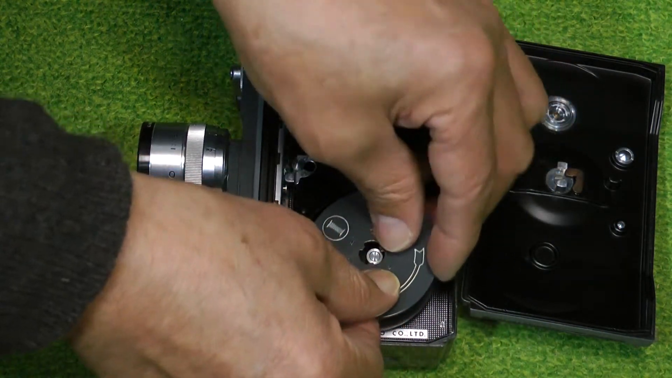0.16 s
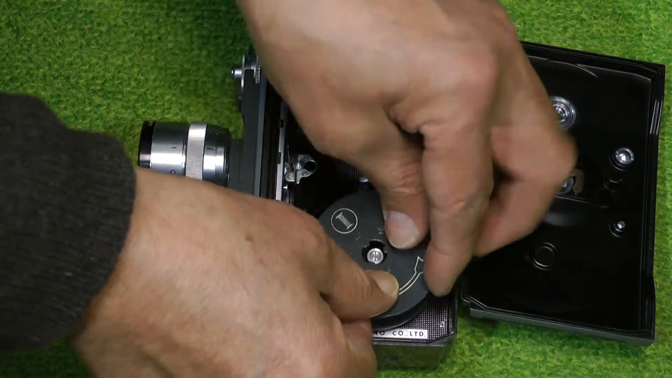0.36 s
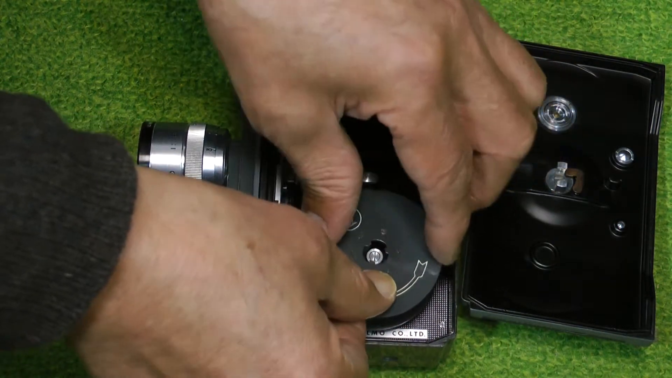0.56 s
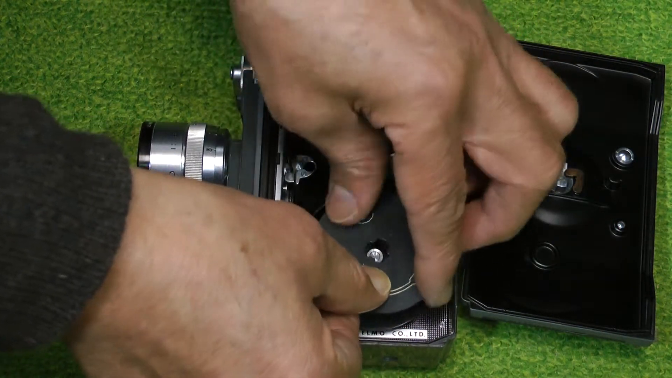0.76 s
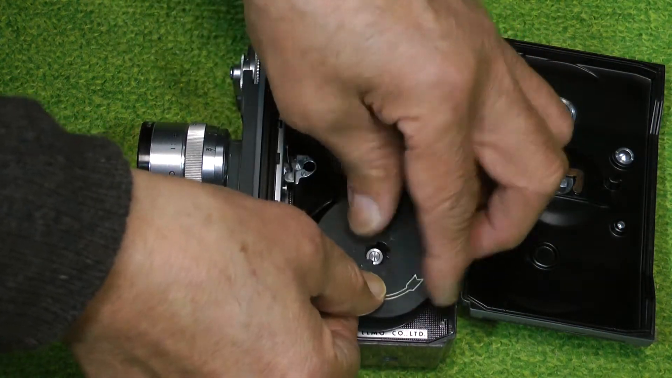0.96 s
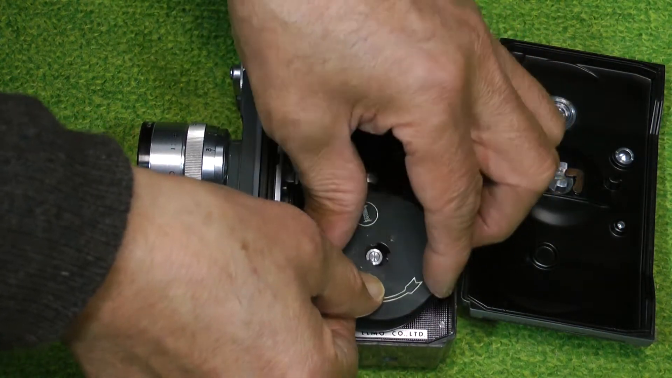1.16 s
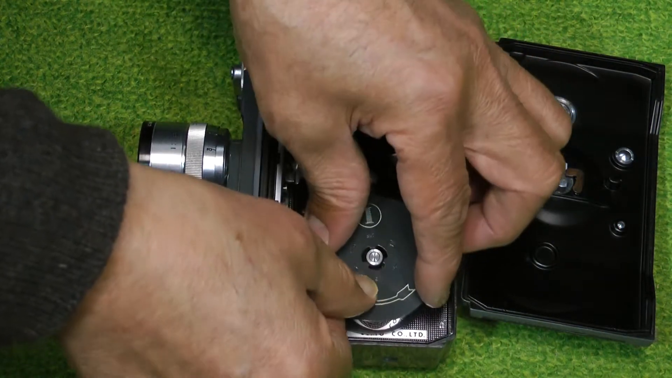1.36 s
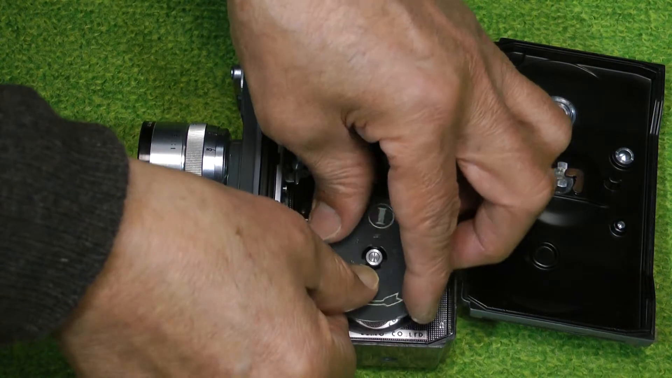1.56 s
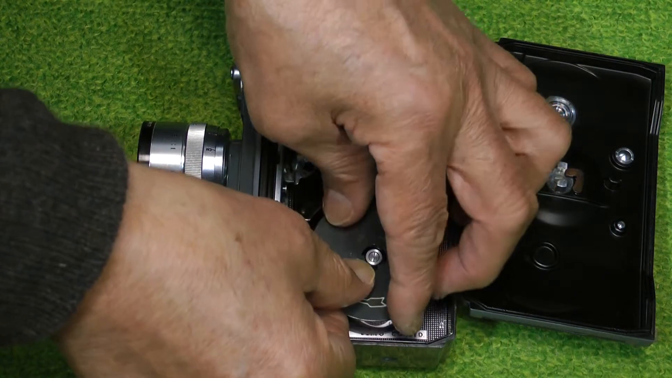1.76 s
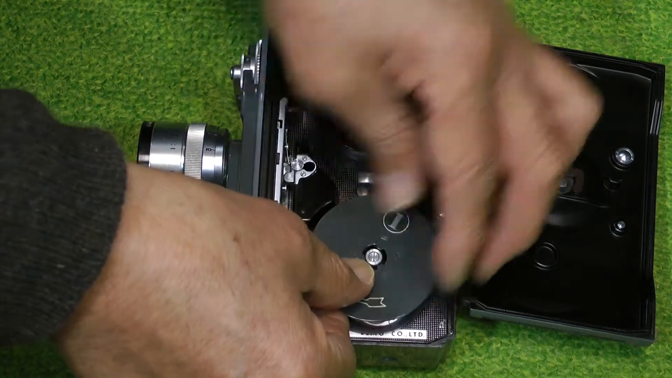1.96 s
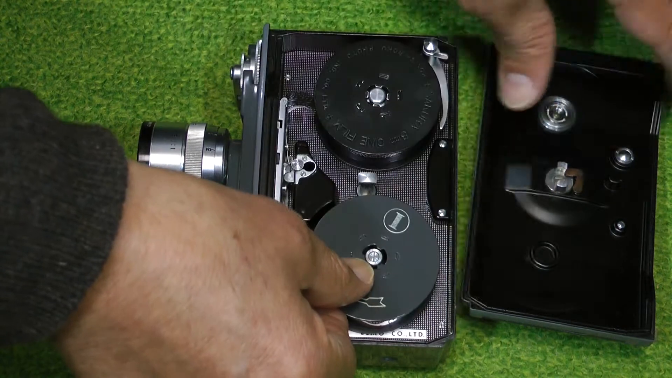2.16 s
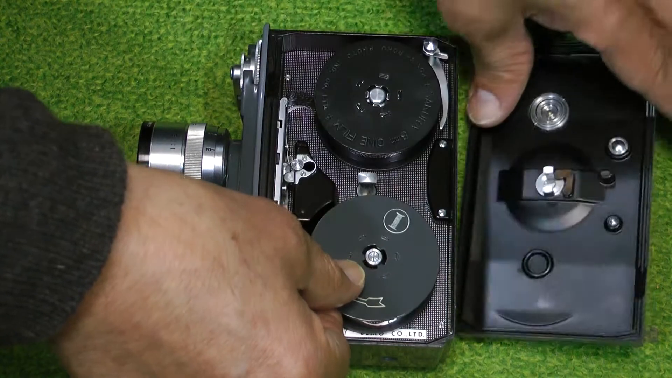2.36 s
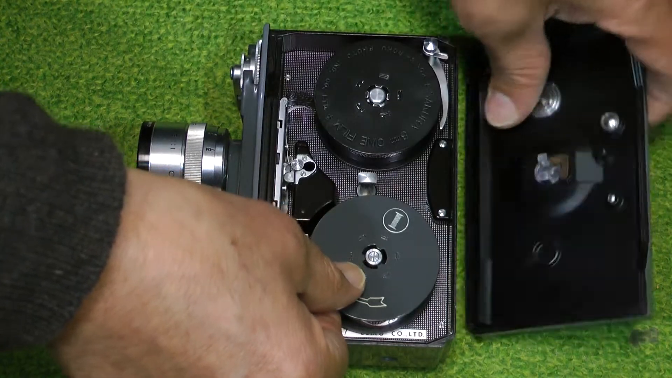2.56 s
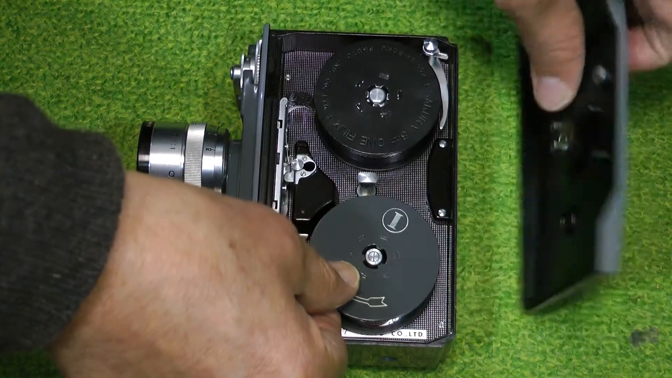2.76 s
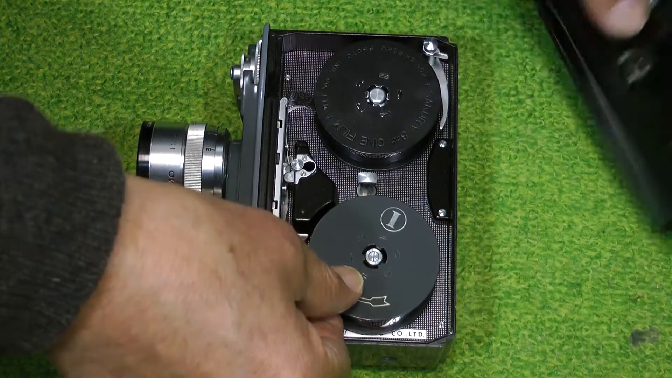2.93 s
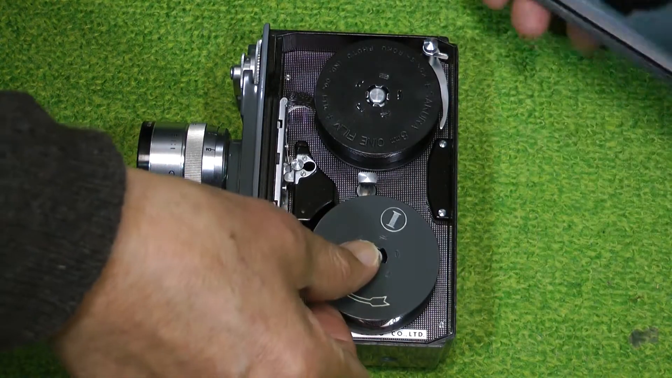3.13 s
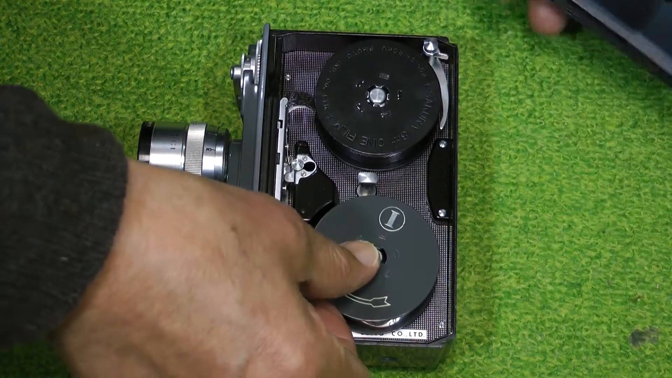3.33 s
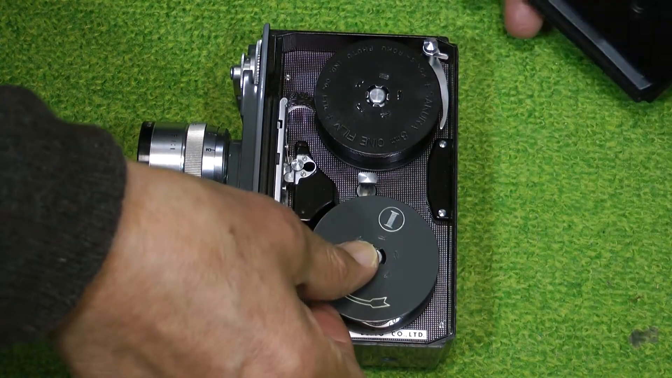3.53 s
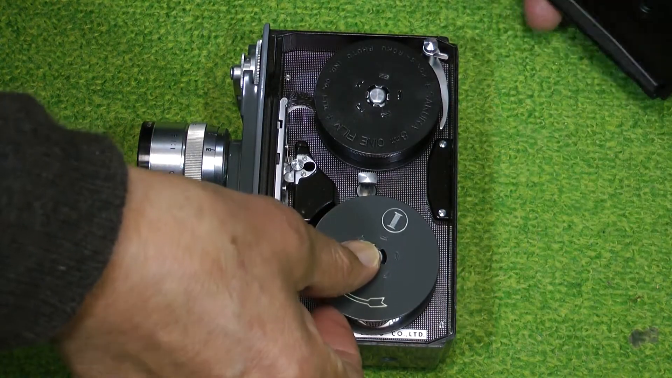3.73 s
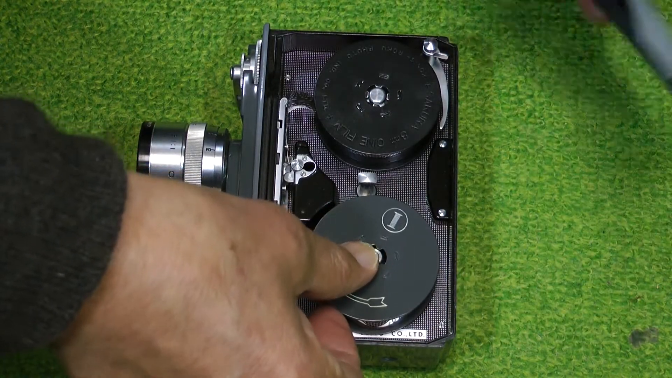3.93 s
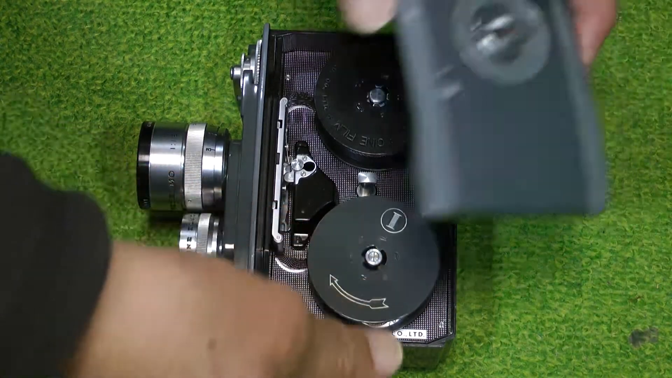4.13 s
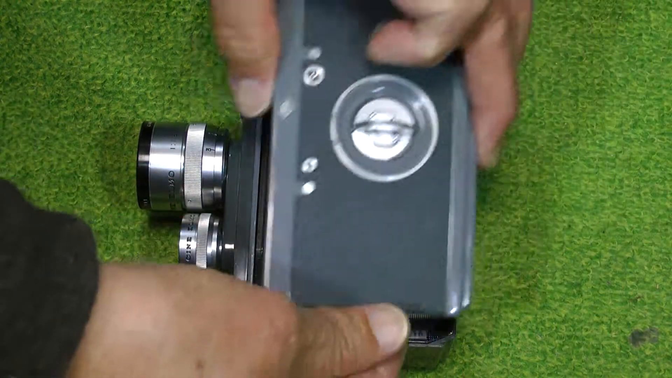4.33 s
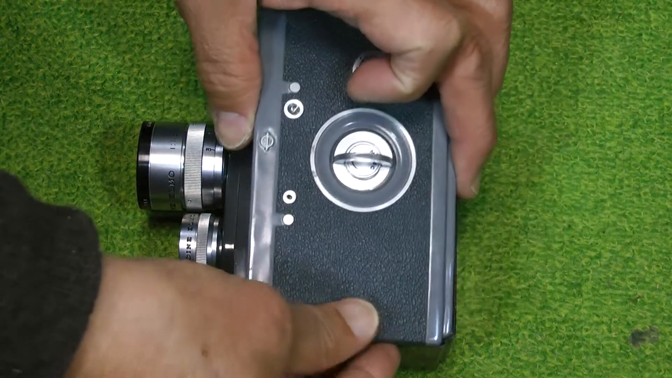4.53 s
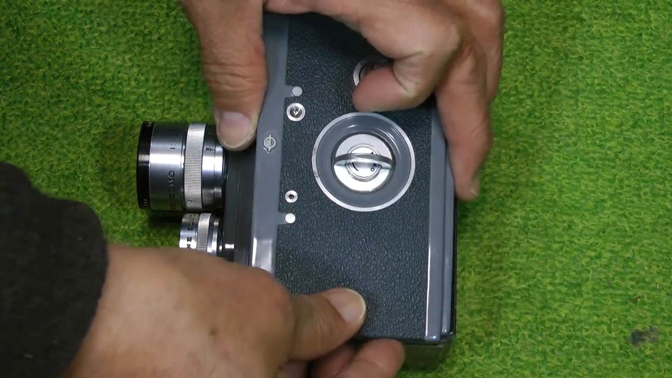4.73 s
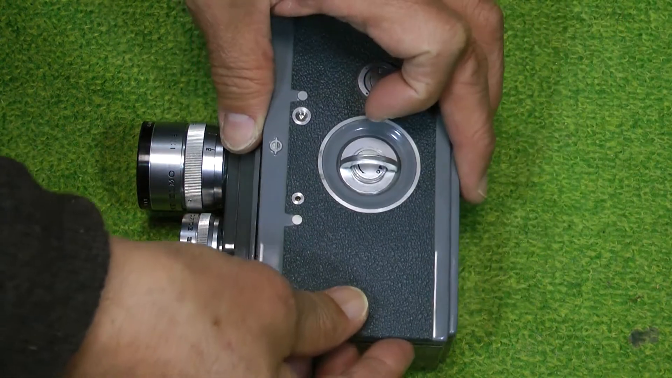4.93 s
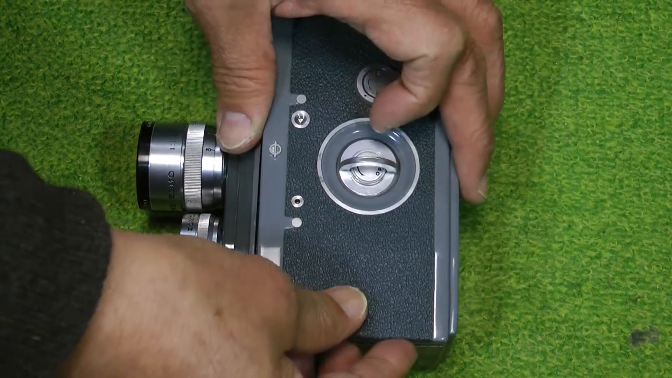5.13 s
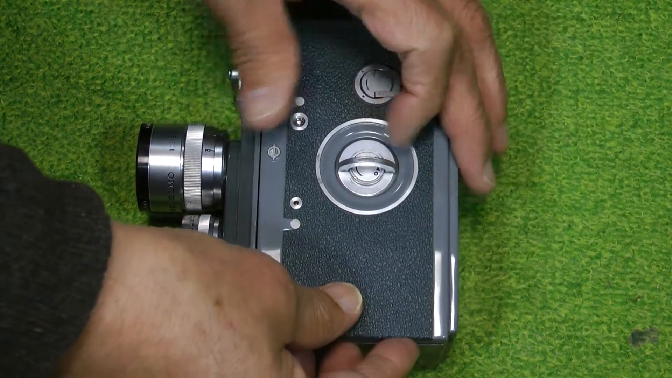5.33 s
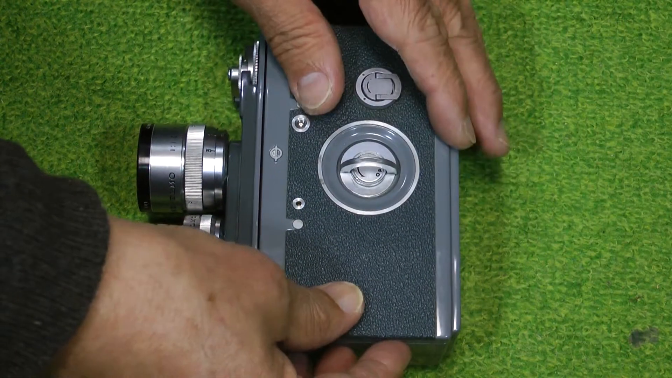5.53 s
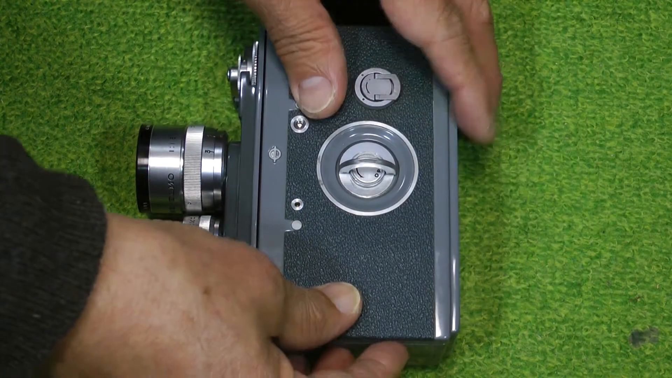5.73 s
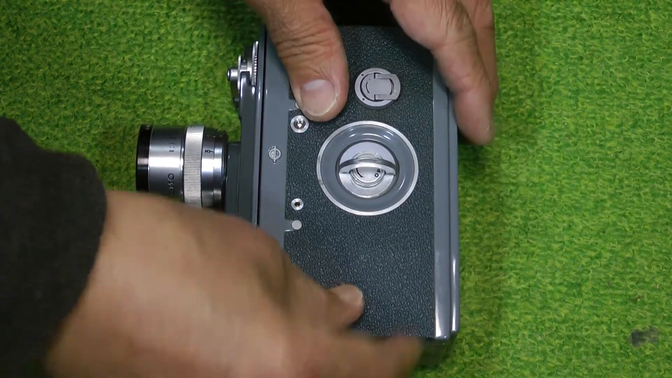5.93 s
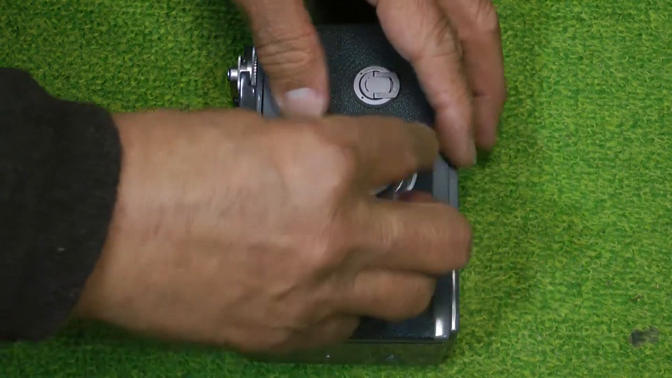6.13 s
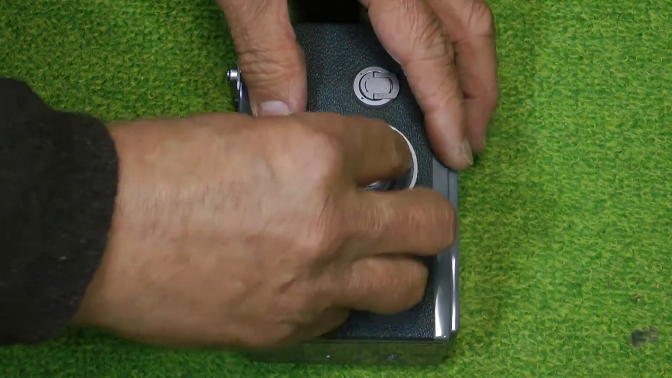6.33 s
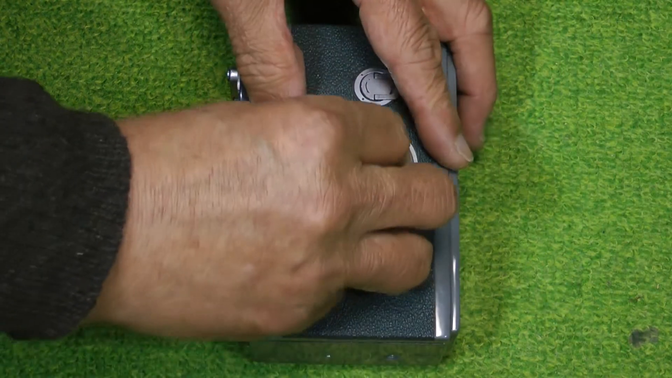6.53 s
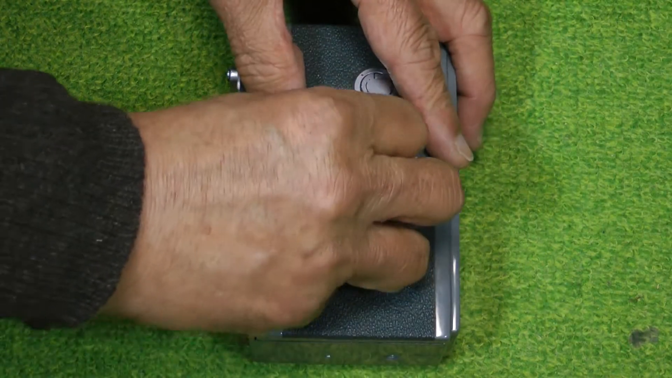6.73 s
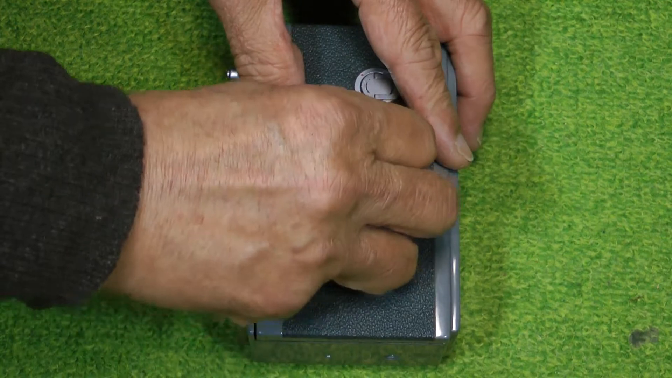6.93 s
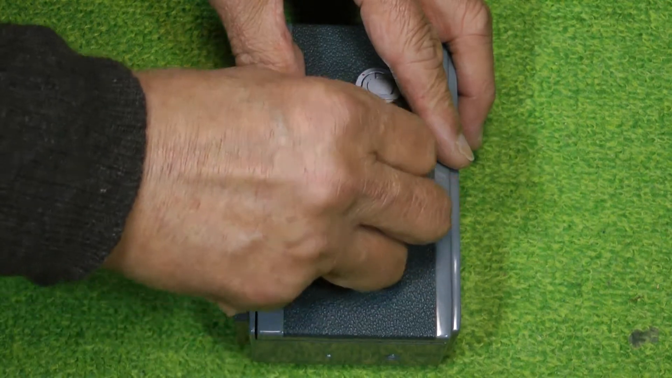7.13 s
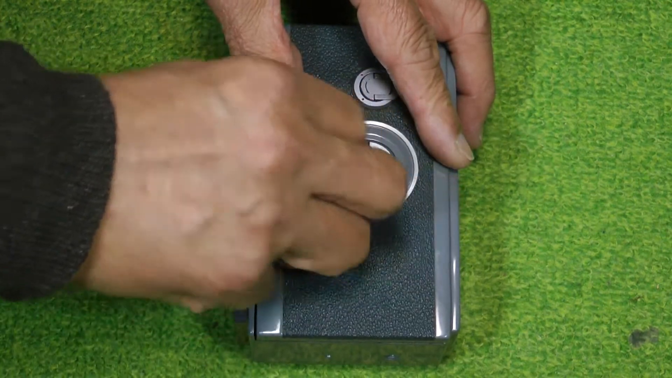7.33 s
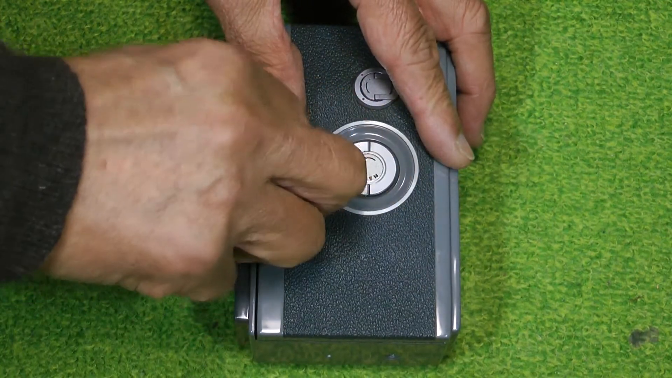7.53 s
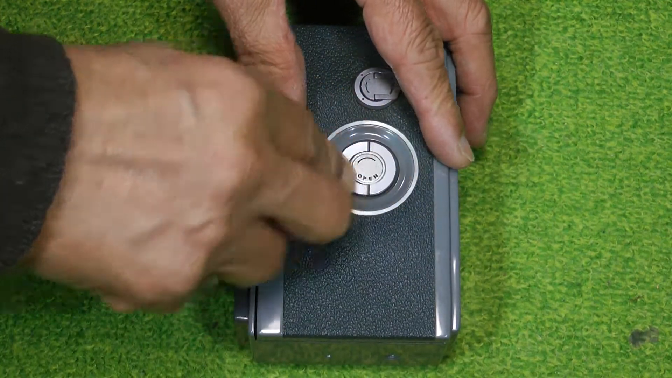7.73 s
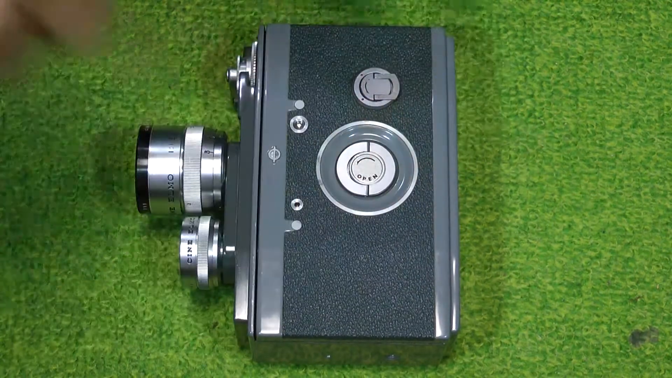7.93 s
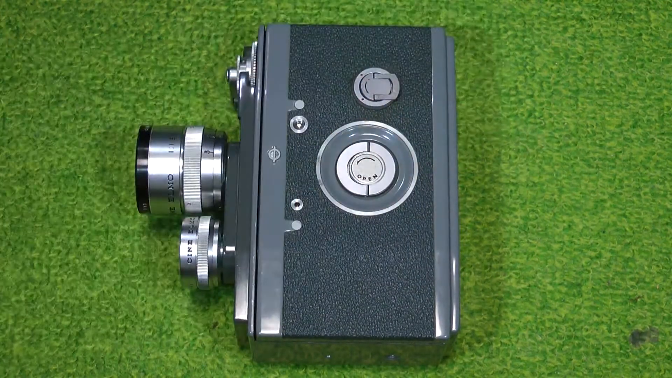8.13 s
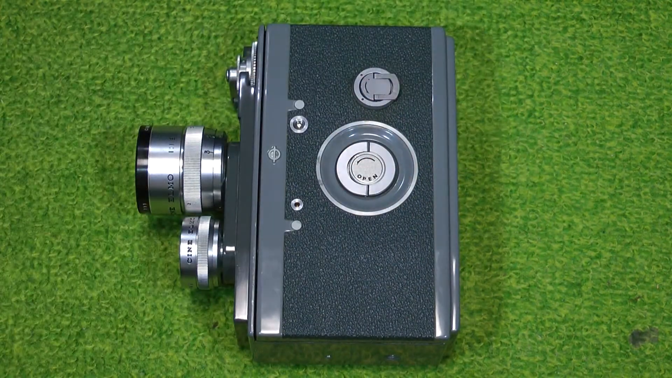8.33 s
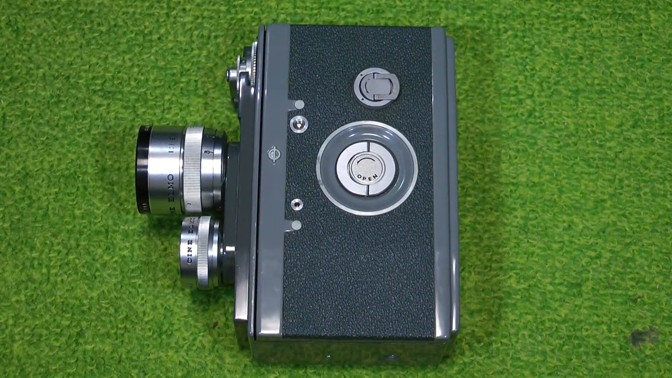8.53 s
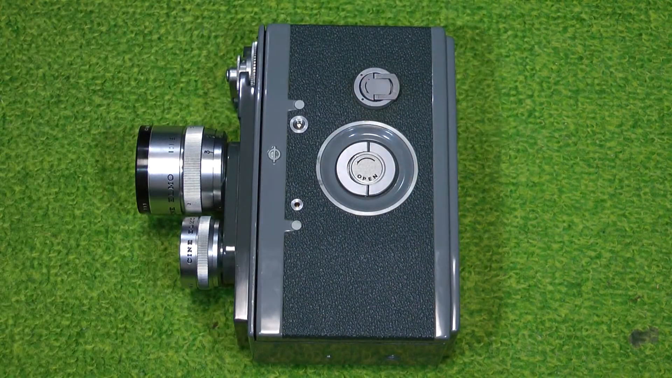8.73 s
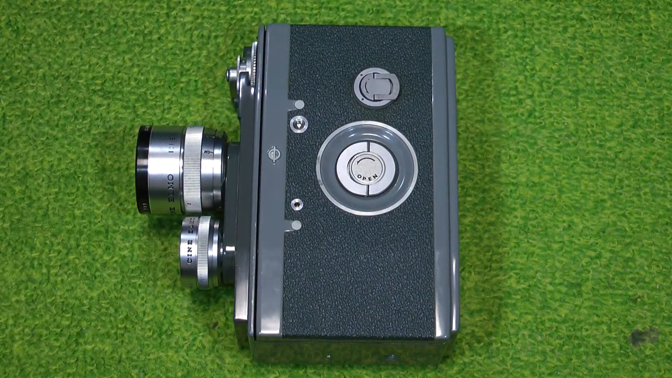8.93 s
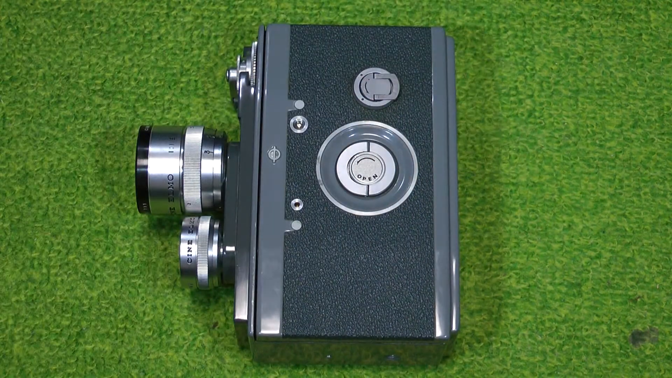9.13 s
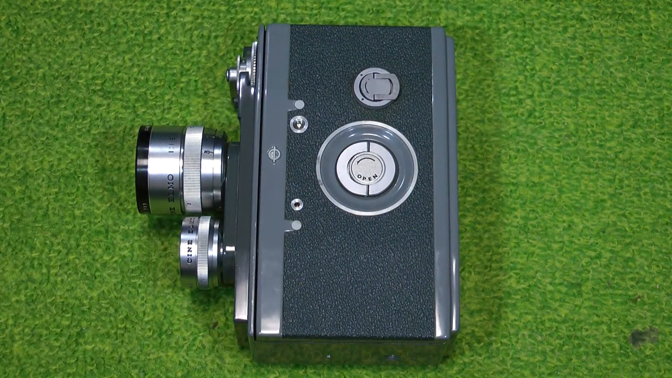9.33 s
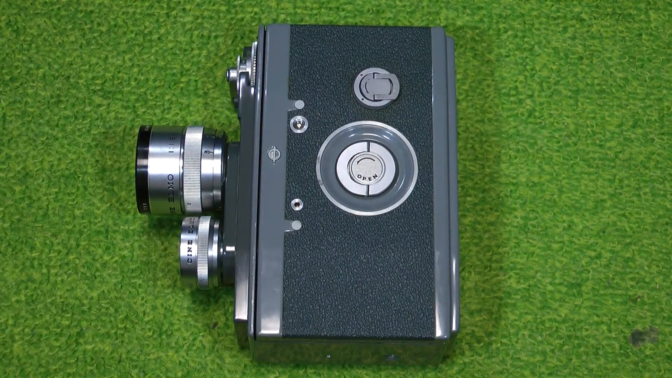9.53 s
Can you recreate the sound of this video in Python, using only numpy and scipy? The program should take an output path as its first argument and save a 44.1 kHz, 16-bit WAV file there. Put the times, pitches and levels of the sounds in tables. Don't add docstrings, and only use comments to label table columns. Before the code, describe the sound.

Close up, a small metal camera is handled: a spool clicks and squeaks into place, a lid clacks on, and a latch snaps flat.

```python
import sys
import numpy as np
from scipy import signal
from scipy.fft import rfft, irfft, next_fast_len
from scipy.io import wavfile
from scipy.ndimage import uniform_filter1d, map_coordinates

SR = 44100
rng = np.random.default_rng(int(sys.argv[2]) if len(sys.argv) > 2 else 0)


def linear_from_db(decibels):
    return 10 ** (np.asarray(decibels, float) / 20)


def inscribe(sig):
    pcm = np.round(np.clip(np.atleast_2d(sig).T, -1, 1) * 32767)
    wavfile.write(sys.argv[1], SR, pcm.astype(np.int16))


N = 426888
HZ = np.maximum(np.fft.rfftfreq(N, 1 / SR), 1)

# pitch_hz, level_db
FLOOR = [(20, -18), (28, -11), (68, -6), (130, -10.5), (363, -13), (796, -30.5), (1020, -27.5),
         (14800, -37), (16000, -47)]
FLOOR_DB = -54.5
# pitch_hz, level_db (rms)
HUM = [
    (59.2, -61),
    (915.2, -79),
]
# pitch_hz, likeness (-1 to 1)
FLOOR_LIKENESS = [(60, 0.56), (240, 0.22), (950, -0.4), (3770, -0.56), (15000, 0.093)]
NEAR_LIKENESS = [(60, 0.88), (180, -0.78), (550, -0.16), (1650, 0.94), (4970, 0.93), (15000, -0.64)]
ROOM_T60_S, ROOM_DB, ROOM_DULL = 0.1, -18, 0.32

# pitch_hz, level_db (per Hz)
SPOOL = [(590, -46), (1200, 14.5), (3700, 9), (7360, -16), (7970, -11.5), (8640, -19), (12000, -15),
         (15500, -19)]
LID = [(590, -34), (1000, -12.5), (1640, -9.5), (1970, -2), (3830, -3.5), (4240, -13.5), (6260, -25.5),
       (15500, -29.5)]
SLEEVE = [(590, 9), (1000, -0.5), (1580, -2.5), (1840, -6), (3080, -4), (5270, -15.5), (9910, -16.5),
          (15500, -19)]
# (pitch_hz, width_hz, lift_db)
RUBBED = [(0, SPOOL, [(1297, 300, 5.9), (3270, 900, 9.9), (2333, 160, 4)]), (.3, SPOOL, [(1730, 600, 3),
          (3400, 700, 8), (2260, 150, 5.2)]), (.51, SPOOL, [(1295, 300, 4), (3600, 800, 10),
          (5340, 500, 3.5), (2300, 300, 4)]), (0.931, SPOOL, [(1380, 350, 7), (2060, 300, 4),
          (3500, 700, 7), (770, 150, 6), (5800, 1200, 9)]), (1.302, SPOOL, [(1300, 250, 4), (3840, 700, 6),
          (2400, 700, 7)]), (2.25, LID, [(2423, 120, 6.6), (3630, 300, 5), (6400, 270, 6)]),
          (2.56, LID, [(1960, 60, 14), (3800, 190, 8), (5200, 80, 11), (3080, 70, 7), (6440, 120, 13),
          (7960, 60, 9), (8600, 200, 7), (6090, 80, 8)]), (2.97, LID, [(2400, 60, 10), (3920, 160, 12),
          (2960, 60, 10), (6400, 200, 13), (8690, 250, 10), (11000, 200, 10), (4680, 130, 7),
          (7050, 450, -18)]), (3.42, LID, [(2370, 100, 11), (3760, 120, 12), (6410, 200, 13), (1970, 60, 8),
          (4450, 200, 6), (11100, 150, 7)]), (3.76, LID, [(3890, 110, 13), (2380, 70, 10), (2000, 70, 8),
          (2780, 80, 8), (6420, 200, 14), (5250, 120, 8), (8660, 220, 9), (10100, 200, 8), (4510, 90, 8),
          (7000, 450, -18)]), (4.12, SPOOL, [(2200, 900, 5), (3300, 980, 4)]), (6.7, SPOOL, [(1190, 600, 4),
          (2977, 1500, 5)]), (7.601, SLEEVE, [(2490, 530, 0.81)])]
CLOTH_FROM_S = RUBBED[-1][0]
FREE, DAMPED, PATCHY_DB = 1.25, 0.5, 2.6
# peak_s, level_db, bright_re_db, rise_s, fall_s (over 20 dB)
SLIDES = [(0, -42, -4, .1, 0.14), (.25, -57.5, -4, 1, .3), (.7, -51.5, -4, 0.15, 0.45),
          (.92, -49, -0.5, 0.21, 0.054), (1.26, -51.5, -9.5, 0.12, 0.59), (1.47, -56, -9, 0.26, 0.089),
          (1.648, -41.5, -9, 0.098, 0.28), (2.48, -48.5, 8.5, 0.2, 0.035), (2.808, -40, 1.5, 0.28, 0.36),
          (3.16, -47.5, -0.5, 0.46, 0.15), (3.41, -49, -4, 0.34, 0.2), (3.9, -50.5, 1.5, 0.27, 0.41),
          (4.819, -57, -10, 0.12, 0.39), (5.0, -57.5, -8, 0.081, 0.9), (5.797, -61, -1.5, 0.26, 0.14),
          (6.15, -50.5, -10, 0.031, 0.35), (5.55, -47, -5.5, .06, 0.022), (8.25, -43, -6.5, 0.094, 0.11),
          (2.295, -53, 0.5, .012, 0.27), (6.84, -48.5, -11.5, 0.055, 0.089),
          (6.743, -50.5, -9.5, 0.07, 0.41), (7.4, -56.5, -10.5, 0.4, 0.71), (8.01, -46, -9, 0.35, 0.58),
          (8.36, -45.5, -3, 0.45, 0.12), (8.72, -59.5, -8, 0.12, 0.23)]
# peak_s, level_db, bright_re_db
TOUCHES = [(.333, -46.5, -18), (0.422, -39.5, -8), (0.545, -51, -6), (.617, -54, -10), (0.74, -50.5, 7.5),
           (1.122, -51.5, -7.5), (1.571, -44, -10), (.665, -52.5, 0), (2.603, -47, -0.5), (3.526, -49.5, 0),
           (3.605, -51, -5), (3.721, -48.5, -6.5), (5.168, -49.5, -22), (5.3, -49, -19), (5.6, -48, -8.5),
           (6.422, -54.5, -6.5)]
TOUCH_RISE_S, TOUCH_FALL_S = 0.067, 0.054
REST_DB, ROUNDED, DULLING = -71, 1.295, 1.3
# peak_s, bump_db, rise_s, fall_s
PRESSES = [
    (.8, -52.5, .45, 0.62),
    (1.5, -54.5, 0.93, 1.24),
    (2.745, -39, 0.075, 0.21),
    (3.0, -59, 0.44, 2.1),
    (5.16, -50.5, 0.58, 0.95),
    (6.36, -46.5, 0.48, 0.37),
    (8.2, -50, 0.45, 0.67),
]
PRESS_REST_DB, CREAK_DB, CREAK_FROM_PRESS, CREAK_FROM_RUB = -62.5, -9.5, 0.46, 0.45

# low_hz, high_hz, favoured_hz, t60_s, left_right_db
METAL = (1600, 4500, 3500, 0.015, 1.9)
BOOM = (520, 1700, 1300, 0.018, 3.6)
EDGE = (5400, 15000, 5940, 0.012, 4.2)
THUD = (248, 420, 256, 0.045, 5.3)
BROAD, FOCUSED, BOOM_BROAD = 0.94, 0.3, 0.53
# start_s, metal_db (peak), boom_re_db, boom_hz, edge_re_db
SPOOL_HITS = [(0.0034, -20.5, -36, 1305, -12), (0.0508, -30, -18, 850, -5.5),
              (0.2551, -22.5, -22, 1010, -7), (0.2598, -18, -15, 805, -10), (0.2925, -6, -16.5, 1210, -2.5),
              (0.7252, -26.5, -17, 1400, -7.5), (0.7412, -6, -7.5, 1160, -22),
              (0.8844, 0.5, -8, 840, -11.5), (0.8955, -12.5, 1.5, 1300, -17), (1.2962, -20.5, 4, 1220, -17),
              (1.2994, -14.5, -10.5, 1090, -15.5), (1.3101, -14, -10, 1220, -7),
              (1.3216, -7.5, -23, 1450, -18.5), (1.343, -20, -13.5, 830, -9.5),
              (1.5458, -19, -9.5, 1340, -9.5)]
# start_s, metal_db, boom_re_db, boom_hz, edge_re_db
LIFT_HITS = [(2.337, -3.5, -16, 702.6, -12), (2.36, -12, -10.5, 930, -35.5), (2.4256, -7, -15, 1190, -21.5),
             (2.599, -42.5, 3, 920, -4), (2.678, -34, 3, 1080, -7), (3.197, -33, 1, 1210, -30),
             (3.3334, -20, -7.5, 1230, -31), (3.393, -8, -20, 1660, -7.5), (4.0861, -43, 12.5, 1100, -24),
             (4.0951, -22.5, -8, 1055, -17)]
# start_s, metal_db, boom_re_db, boom_hz, edge_re_db
SEAT_HITS = [(4.7815, -15.5, 4, 1250, -32), (4.878, -53, 18.5, 607, -12), (5.0233, -24, 5.5, 1160, -26),
             (5.061, -43, 22, 824, -18), (5.1269, -8.5, -7, 1610, -26.5), (5.181, -50, 19.5, 730, -15),
             (5.2245, -11.5, -5.5, 777, -23.5), (5.2635, 0, -7, 717, -19.5),
             (5.4576, -50.5, 20.5, 556, -11), (5.543, -43.5, 18, 659, -19.5), (5.5521, -18, -2, 1164, -5),
             (5.5621, -1, -10, 1590, -16), (5.5689, -19.5, 6, 740, -11)]
# start_s, metal_db, boom_re_db, boom_hz, edge_re_db
LATCH_HITS = [(6.211, -49.5, 25, 635, -27), (6.2304, -21, 8.5, 617, -25), (6.2415, -5.5, -5, 577, -34),
              (6.3055, -16.5, -3, 595, -27), (6.4239, -48.5, 18.5, 567, -22.5),
              (6.4889, -19.5, 10.5, 700, -15.5), (6.4937, -3.5, -4, 817, -26),
              (6.7544, -46.5, 10, 1070, -16), (6.9699, -18.5, -6, 1370, -34),
              (7.5176, -0.5, -8, 1465, -4.5), (7.7791, -45.5, -8.5, 1425, -39.5),
              (8.0724, -18.5, -15, 694, -25)]
# start_s, metal_db, boom_re_db, boom_hz,
# edge_re_db
REBOUNDS = [(.881, -24.5, -2.5, 1218, -18), (.912, -24.5, -9, 1294, -11.5),
            (2.3765, -29, -0.5, 1500, -27.5), (4.7865, -16, -10, 1203, -35.5),
            (4.7905, -20, -3, 980, -31.5), (5.5555, -11.5, -7.5, 908.5, -15.5),
            (5.565, -4.5, -10.5, 1540, -14), (6.234, -24, 11.5, 690, -29.5), (6.4835, -23, 1.5, 904, -28.5),
            (7.5153, -26.5, -2.5, 1190, -10), (7.53, -27.5, -10, 1470, -8.5),
            (9.515, -67.5, 13.5, 890, -20.5), (4.373, -46.5, -17, 900, -17),
            (3.355, -34.5, -10.5, 1310, -19)]
# start_s, metal_db (peak), boom_re_db
TICKS = [(0.025, -31, -23), (0.0966, -35.5, -16), (0.166, -37.5, -21), (0.5203, -42.5, -4.5),
         (0.5755, -35.5, -15), (0.6048, -31, -17), (1.004, -38, -11.5), (1.402, -47.5, 7),
         (1.509, -35, -13), (1.699, -27.5, -9.5), (1.708, -26.5, -12), (1.796, -36.5, -4), (1.88, -35, -30),
         (1.944, -53, 8), (1.991, -52, 7.5), (2.0566, -57, 12.5), (3.001, -22, -50), (4.9583, -31, -14),
         (6.139, -45, -1), (6.791, -39.5, 3.5), (8.158, -34.5, -30), (1.451, -49, 0), (1.482, -42, -8),
         (1.518, -45, -15), (1.601, -43, -16), (2.138, -62, -9), (2.252, -61, 6.5), (2.291, -52, -9),
         (3.598, -37.5, -23.5), (3.787, -49, -22), (3.857, -57, -27), (5.36, -54.5, -13), (8.584, -55, -3),
         (8.3, -34, -18), (.66, -33.5, -14)]
TICK_EDGE_DB = -15.5
# start_s, metal_hz, ring_time_share, left_right_shift_db
PLACES = [(.2551, 3590, 1.5, -0.5), (.292, 3548, .7, -3), (.7412, 2660, 0.78, 1), (.8844, 3641, .8, 0.5),
          (.8955, 3650, .8, -3), (1.2994, 3000, 2, 2.5), (1.3101, 3700, 0.97, -0.1),
          (1.3216, 3820, 0.72, -1.5), (1.343, 3270, 1.8, -1), (1.5458, 3270, 1.84, 0),
          (2.3366, 3420, 0.55, -3.5), (2.361, 3350, 1.1, -5), (2.4249, 2700, 0.36, 1),
          (3.001, 2950, 0.44, 2.5), (3.3328, 2800, 0.62, 1.5), (3.395, 3360, 1.18, 1),
          (4.0954, 3500, 1.03, 0.5), (4.781, 2497, 0.61, 4.5), (4.7865, 3500, 0.58, -5.5),
          (5.0235, 2630, 0.77, 1), (5.1269, 2007, 1.4, 0.5), (5.2242, 3450, 0.79, 1.5),
          (5.2634, 3252, 0.82, -0.5), (5.5555, 3260, .9, 4), (5.5618, 2654, 0.83, -1), (6.2303, 2780, 1, 5),
          (5.5688, 3037, 0.62, 1), (1.2962, 3335, 1.1, 2.5), (6.2408, 2872, 1, -0.5),
          (6.3064, 2320, 0.89, 1), (6.4928, 1790, .7, 1), (6.9688, 3520, 0.43, 1), (7.5174, 2513, 0.45, -2),
          (8.0713, 2760, 0.34, 4.5), (8.158, 4070, 1.2, -5)]
# start_s, thud_db (peak)
LANDINGS = [(.7411, -17.5), (2.4252, -24.5), (4.781, -25.5), (5.0247, -26.5), (5.568, -30), (6.4885, -25),
            (6.7524, -32.5), (7.7787, -42), (8.0725, -40.5)]
THUD_DB, THUD_FOLLOWS = -23, 0.56
# start_s, pitch_hz, level_db (peak), t60_s
RINGS = [(.742, 1262, -11, 0.02), (3.395, 1616, -14, 0.03), (6.494, 1730, -15, 0.025),
         (5.564, 1605, -15, 0.025), (2.3372, 3420, 5, .012), (.2926, 3490, 0, .012),
         (5.563, 4800, -10, .012), (7.518, 9000, -14, .025), (.2928, 11740, -17, .035),
         (.294, 2300, -22, .08), (.294, 7700, -25, .05), (2.339, 2430, -20, .07), (2.426, 2440, -18, .06),
         (2.4256, 3640, -11, .02), (2.4256, 1670, -10, .014), (.293, 11750, -42, .25),
         (2.352, 894, -27, .7), (1.2972, 1290, -9, .025), (1.301, 1200, -8, .022), (7.52, 750, -30, .15),
         (2.598, 118, -31, .3)]

# start_s, end_s, pitch_hz, width_hz, level_db
SQUEAKS = [(0.736, 0.793, 85, 50, -36), (2.705, 2.785, 117, 40, -35.5), (2.812, 2.904, 901, 50, -43.5),
           (4.965, 5.038, 885, 500, -40.5), (5.224, 5.275, 780, 258, -36), (5.434, 5.505, 622, 121, -45.5),
           (5.534, 5.556, 700, 200, -32), (6.143, 6.196, 615, 220, -39), (6.279, 6.312, 845, 120, -27),
           (6.254, 6.27, 660, 250, -32), (6.505, 6.55, 850, 200, -45), (8.04, 8.42, 330, 260, -57),
           (5.51, 5.54, 620, 250, -46), (6.755, 6.81, 300, 120, -46), (6.724, 6.765, 1150, 590, -45),
           (6.751, 6.823, 110, 60, -42), (6.5, 6.8, 1710, 50, -62)]
# start_s, end_s, level_db
WHISTLES = [(1.335, 1.392, -45), (1.39, 1.52, -63), (1.56, 1.608, -52), (1.636, 1.683, -54),
            (1.697, 1.72, -48)]
# pitch_hz, level_db
WHISTLE_MODES = [(7780, 3.5), (11780, -4)]
# (pitch_hz, width_hz, level_db)
RATTLES = [
    (1.301, [(2464, 3600, -20), (9400, 6100, -35)]),
    (7.523, [(3000, 4400, -29), (4040, 400, -34), (9340, 1200, -25.5), (12260, 1600, -28.5)]),
]
RATTLE_T60_S = 0.17
# start_s, right_sag (full scale); the left side always sags alike
OVERLOADS = [(0.294, 0.108), (.886, 0.072), (2.338, 0.105), (5.2635, .105), (5.563, 0.097), (6.492, -.013),
             (7.519, 0.1)]
LEFT_SAG, SAG_S = 0.104, 0.07


def rms_one(x):
    return x / np.sqrt(np.mean(x ** 2) + 1e-20)


def at_hz(points, hz):
    pitch_hz, value = np.array(points).T
    return np.interp(np.log(hz), np.log(pitch_hz), value)


def lean(left_right_db):
    return linear_from_db([[left_right_db / 2], [-left_right_db / 2]])


def add(out, s, wave):
    i = round(s * SR)
    out[:, i:i + wave.shape[-1]] += wave[..., :N - i]


def pair(mid, side, likeness):
    alike = np.clip(at_hz(likeness, HZ), -0.95, 0.98)
    return np.sqrt(1 + alike) * rfft(mid) + np.sqrt(1 - alike) * rfft(side) * [[1], [-1]]


def floor():
    hiss = irfft(pair(*rng.standard_normal((2, N)), FLOOR_LIKENESS) * linear_from_db(at_hz(FLOOR, HZ)), N)
    t = np.arange(N) / SR
    waver = np.interp(np.arange(N), np.linspace(0, N, 60), rng.standard_normal(60))
    hum = sum(linear_from_db(level_db + 3.0 + 1.4 * waver) * np.sin(2 * np.pi * hz * t) for hz, level_db in HUM)
    return linear_from_db(FLOOR_DB - 4.0) * rms_one(hiss) + hum


def swells(s, peak_db, rise_s, fall_s, rest_db, fade=1.0):
    t = np.arange(0, N, 64)[:, None] / SR
    away = np.where(t < s, (s - t) / rise_s, (t - s) / fall_s)
    level_db = np.maximum(np.max(peak_db - 20 * fade * away ** ROUNDED, axis=1), rest_db)
    return np.interp(np.arange(N) / SR, t[:, 0], level_db)


def fingers():
    rows = list(SLIDES) + [(*row, TOUCH_RISE_S, TOUCH_FALL_S) for row in TOUCHES]
    s, db, bright_re_db, rise_s, fall_s = np.transpose(rows)
    rub_db = swells(s, db, rise_s, fall_s, REST_DB)
    return rub_db, swells(s, db + bright_re_db, rise_s, fall_s, REST_DB - 7.5, DULLING)


def grit(per_s, spread_db, until_s=99):
    jumps = linear_from_db(spread_db * np.minimum(rng.exponential(1, N), 4))
    slips = (rng.random(N) < per_s / SR) * jumps * (np.arange(N) < until_s * SR)
    clumps = signal.lfilter([1], [1, -0.985], slips)
    return rng.standard_normal((2, N)) * (1 + clumps)


def patchy(x):
    _, _, z = signal.stft(x, nperseg=512)
    coarse = rng.standard_normal((20, z.shape[2] // 7 + 2))
    bands, frames = np.linspace(0, 19, z.shape[1]), np.arange(z.shape[2]) / 7
    patches = map_coordinates(coarse, np.meshgrid(bands, frames, indexing="ij"), order=1)
    return signal.istft(z * linear_from_db(PATCHY_DB * patches), nperseg=512)[1][:, :N]


def section(starts, k):
    t, end = np.arange(N) / SR, (list(starts) + [N])[k + 1]
    return uniform_filter1d(((t >= starts[k]) & (t < end)) * 1.0, size=800)


def resonances(peaks, turn, hz):
    lift_db = 0
    for j, (at, width, db) in enumerate(peaks):
        share = 1 if db < 0 else FREE if j % 2 == turn else DAMPED
        lift_db = lift_db + db * share / (1 + (2 * (hz - at) / width) ** 2)
    return lift_db


def rubbing(rub_db, bright_db):
    source = irfft(pair(*grit(500.0, 0.74, CLOTH_FROM_S), NEAR_LIKENESS), N)
    body, bright = np.zeros((2, N)), np.zeros((2, N))
    starts = [row[0] for row in RUBBED]
    grip = np.interp(np.arange(N), np.linspace(0, N, 230), rng.random(230).round())
    for k, (_, colour, peaks) in enumerate(RUBBED):
        gate = section(starts, k)
        held = gate > 1e-9
        count = int(held.sum())
        size = next_fast_len(count)
        hz = np.maximum(np.fft.rfftfreq(size, 1 / SR), 1)
        low = 1 / (1 + (hz / 5000) ** 12)
        raw = rfft(source[:, held], size) / (1 + (1000 / hz) ** 4)
        for turn, share in enumerate((grip, 1 - grip)):
            coloured = raw * linear_from_db(at_hz(colour, hz) + resonances(peaks, turn, hz))
            gain = (gate * share)[held]
            body[:, held] += gain * rms_one(irfft(coloured * low, size)[:, :count])
            bright[:, held] += gain * rms_one(irfft(coloured * (1 - low), size)[:, :count])
    return (linear_from_db(rub_db) * patchy(body) + linear_from_db(bright_db) * patchy(bright)) * lean(2.4)


def creak(creak_db):
    source = pair(*grit(200.0, 1.2, CLOTH_FROM_S), NEAR_LIKENESS)
    source = source / (1 + (420 / HZ) ** 4) / (1 + (HZ / 1250) ** 4)
    return linear_from_db(creak_db) * rms_one(irfft(source, N)) * lean(5)


def bumps(bump_db):
    shape = 1.2 + 1 / (1 + ((HZ - 120) / 20.0) ** 2)
    shape = shape / (1 + (70 / HZ) ** 4) / (1 + (HZ / 420) ** 4)
    source = pair(*grit(53.0, 3.2, CLOTH_FROM_S), NEAR_LIKENESS)
    return linear_from_db(bump_db) * rms_one(irfft(source * shape, N)) * lean(3)


def struck(zone, chance, contact_s, favoured_hz=None, lasts=1, broad=BROAD):
    t = np.arange(SR // 10) / SR
    low_hz, high_hz, best_hz, t60, pan_db = zone
    size, tune, phase, lag = chance.T[:, :, None]
    hz = np.geomspace(low_hz, high_hz, len(chance))[:, None] * (1 + 0.02 * tune)
    near = 1 / (1 + (np.log2(hz / (favoured_hz or best_hz)) / 0.33) ** 2)
    decay_db = -60 * t / (t60 * lasts * (0.5 + near))
    body = (broad + near) * linear_from_db(3.5 * size + decay_db)
    apart = 1.15 * lag / (1 + (6500 / hz) ** 3) + 130 / hz
    angle = 2 * np.pi * hz * t + 3 * phase
    wave = np.array([np.sum(body * np.sin(angle + ear * apart), axis=0) for ear in (-1, 1)])
    wave = wave * (1 - np.exp(-t / contact_s))
    return wave / np.abs(wave).max() * lean(pan_db)


def thudding(table):
    return [(*row, THUD_DB + THUD_FOLLOWS * (row[1] + row[2])) for row in table]


def hits():
    rows = thudding(SPOOL_HITS + LIFT_HITS + SEAT_HITS + LATCH_HITS)
    rows += [(s, db, boom_db, None, TICK_EDGE_DB, db - 40.5) for s, db, boom_db in TICKS]
    rows += thudding(REBOUNDS)
    places = {np.argmin([abs(row[0] - s) for row in rows]): place for s, *place in PLACES}
    crack_band = signal.butter(2, [1500, 15500], "band", fs=SR, output="sos")
    out = np.zeros((2, N))
    for k, (s, metal_db, boom_db, boom_hz, edge_db, thud_db) in enumerate(rows):
        metal_hz, lasts, shift_db = places.get(k, (None, 1, 0))
        luck = rng.standard_normal((4, 22, 4))
        crack = rng.standard_normal((2, 900)) * np.exp(-np.arange(900) / 110.0)
        mid, side = signal.sosfilt(crack_band, crack)
        wave = struck(METAL, luck[0], 0.000063, metal_hz, lasts, FOCUSED if metal_hz else BROAD)
        wave += linear_from_db(boom_db + 2.0) * struck(BOOM, luck[1], 0.0015, boom_hz, lasts, BOOM_BROAD)
        wave += linear_from_db(edge_db + 7.5) * struck(EDGE, luck[2], 0.00028, None, lasts)
        wave[:, :900] += linear_from_db(edge_db - 5.0) * (mid + 0.6 * side * [[1], [-1]])
        wave = linear_from_db(metal_db + 1.0) * wave * lean(shift_db)
        heavy_db = [db for at, db in LANDINGS if abs(at - s) < 0.003]
        add(out, s, wave + linear_from_db(max([thud_db] + heavy_db)) * struck(THUD, luck[3, :4], 0.0086))
    return out


def room(x):
    t = np.arange(SR // 3) / SR
    arrivals = 0.5 * (t > 0.003) + 0.5 * (t > 0.012)
    wash = rng.standard_normal((2, len(t))) * linear_from_db(-60 * t / ROOM_T60_S) * arrivals
    wash = signal.lfilter([1], [1, -ROOM_DULL], wash)
    wash = wash / np.sqrt(np.sum(wash ** 2, axis=1, keepdims=True))
    return linear_from_db(ROOM_DB) * signal.fftconvolve(x, wash, axes=1)[:, :N]


def rings():
    out, t = np.zeros((2, N)), np.arange(SR) / SR
    for s, hz, peak_db, t60 in RINGS:
        neighbour = 0.49 * np.sin(2 * np.pi * hz * 0.89 * t + 1.0) * np.exp(-t / 0.14)
        note = np.sin(2 * np.pi * hz * t) + neighbour
        build_up = 1 - np.exp(-t / (0.0042 * t60))
        add(out, s, linear_from_db(peak_db - 60 * t / t60) * build_up * note * lean(3))
    return out


def slip_band(slips, start, end, hz, width):
    edges = [hz - min(width, hz) / 2, hz + width / 2]
    band = signal.butter(1, edges, "band", fs=SR, output="sos")
    stretch = slips[round(start * SR) - 2000:round(end * SR)]
    return rms_one(signal.sosfilt(np.vstack([band, band]), stretch)[2000:])


def squeaks(slips):
    out = np.zeros((2, N))
    whistles = [(start, end, hz, 90.0, db + mode_db)
                for start, end, db in WHISTLES for hz, mode_db in WHISTLE_MODES]
    for start, end, hz, width, level_db in list(SQUEAKS) + whistles:
        tone = slip_band(slips[0], start, end, hz, width)
        swell = np.sqrt(np.sin(np.pi * np.linspace(0, 1, len(tone)) ** 0.68).clip(0))
        add(out, start, linear_from_db(level_db) * tone * swell * lean(5))
    return out


def rattles(slips):
    out = np.zeros((2, N))
    for s, parts in RATTLES:
        for hz, width, level_db in parts:
            mid, side = [slip_band(ear, s, s + RATTLE_T60_S, hz, width) for ear in slips]
            decay = linear_from_db(np.linspace(level_db, level_db - 62.0, len(mid)))
            add(out, s, decay * (mid + hz / 15000 * side * [[1], [-1]]))
    return out


def scene():
    rub_db, bright_db = fingers()
    bump_db = swells(*np.transpose(PRESSES), PRESS_REST_DB)
    creak_db = CREAK_DB + CREAK_FROM_PRESS * bump_db + CREAK_FROM_RUB * rub_db
    slips = grit(150.0, 2.1)
    hands = rubbing(rub_db, bright_db) + creak(creak_db) + bumps(bump_db)
    hands += squeaks(slips) + rattles(slips)
    blows = hits()
    return floor() + hands + blows + room(blows) + rings()


def band_limit(x):
    return signal.sosfilt(signal.butter(12, 16520, fs=SR, output="sos"), x)


def record(dry):
    out, t = np.clip(dry, -1, 1), np.arange(SR) / SR / SAG_S
    recovery = (1 - t) * np.exp(-t) * (1 - np.exp(-t / 0.01))
    for s, right_sag in OVERLOADS:
        add(out, s, -np.array([[LEFT_SAG], [right_sag]]) * recovery)
    out = signal.sosfilt(signal.cheby2(10, 50, 16600, fs=SR, output="sos"), out)
    return band_limit(np.clip(out, -1, 1))


dry = scene()
out = record(dry)
inscribe(out)
```